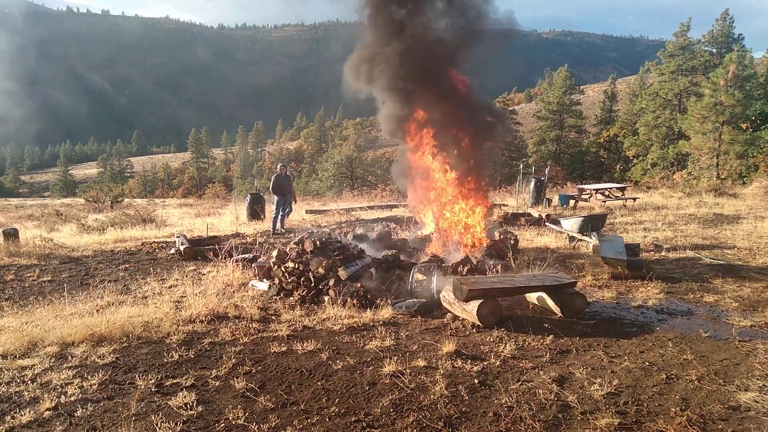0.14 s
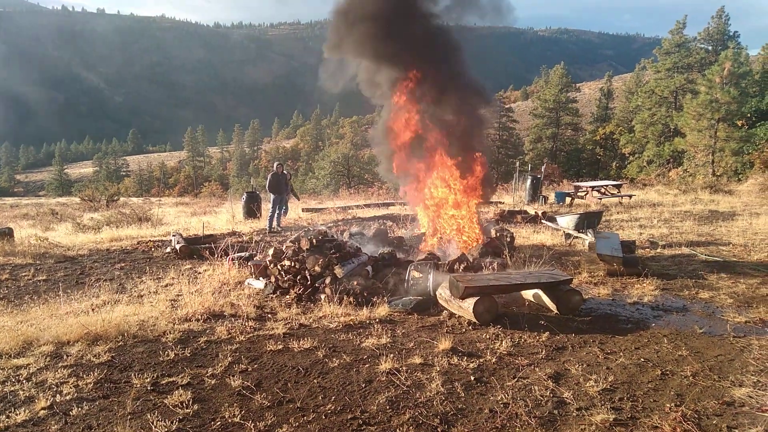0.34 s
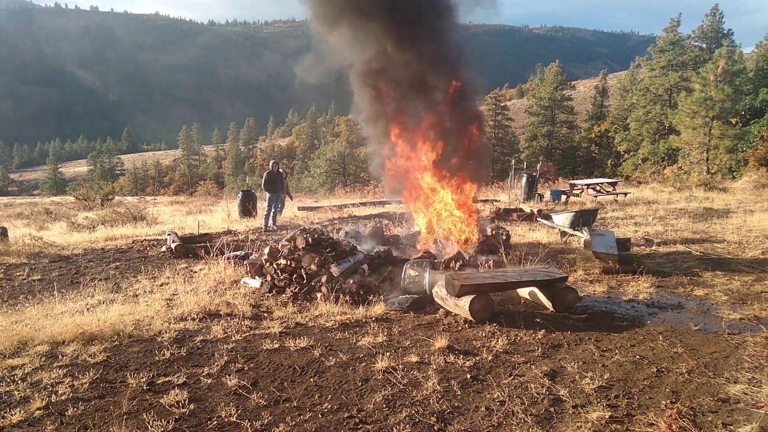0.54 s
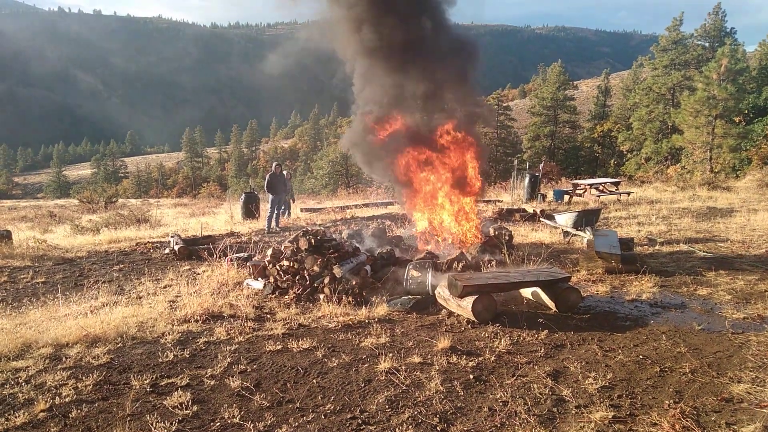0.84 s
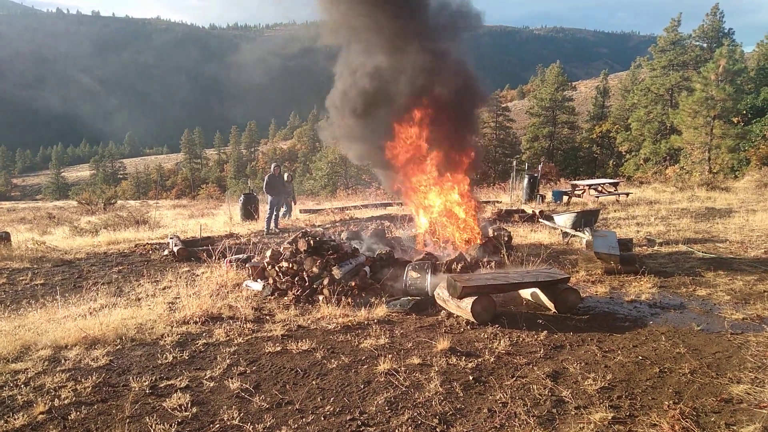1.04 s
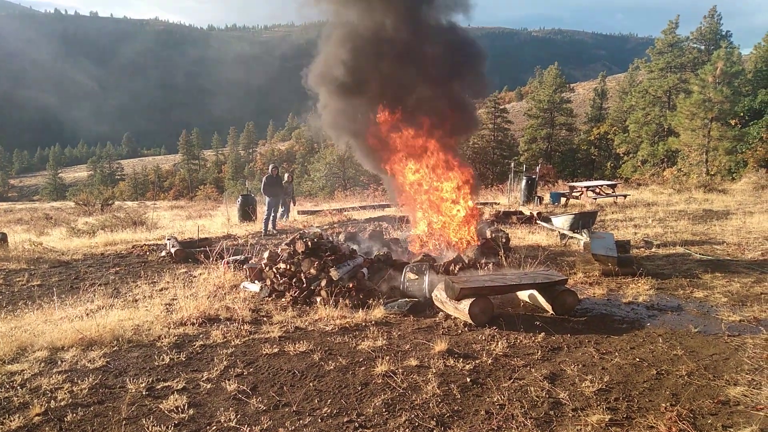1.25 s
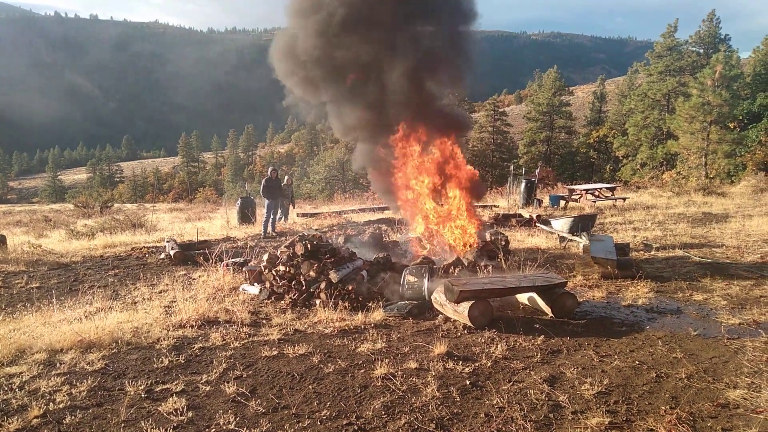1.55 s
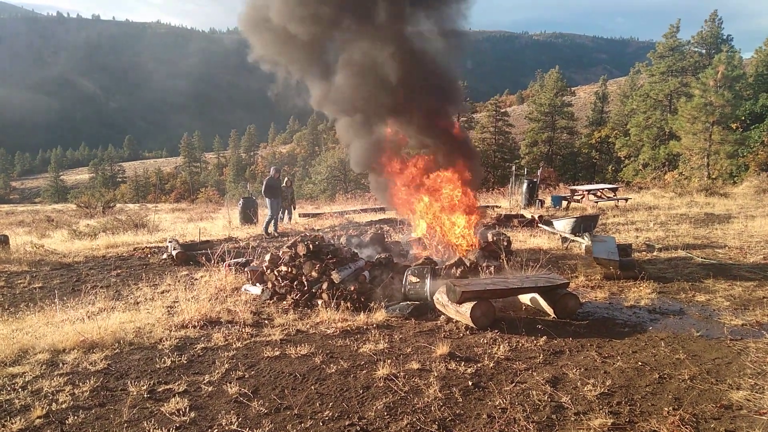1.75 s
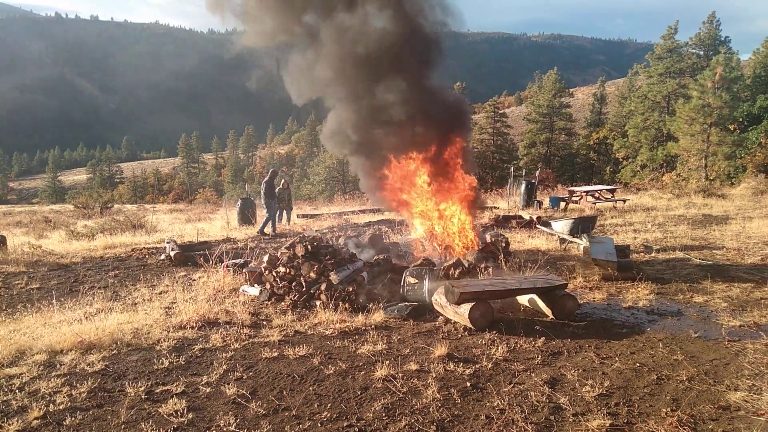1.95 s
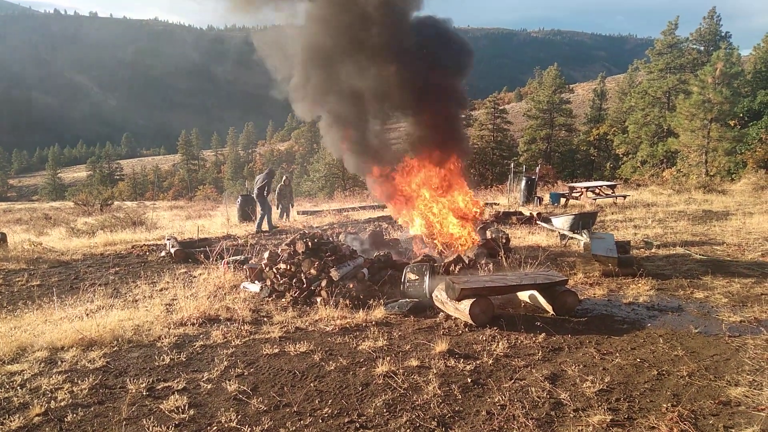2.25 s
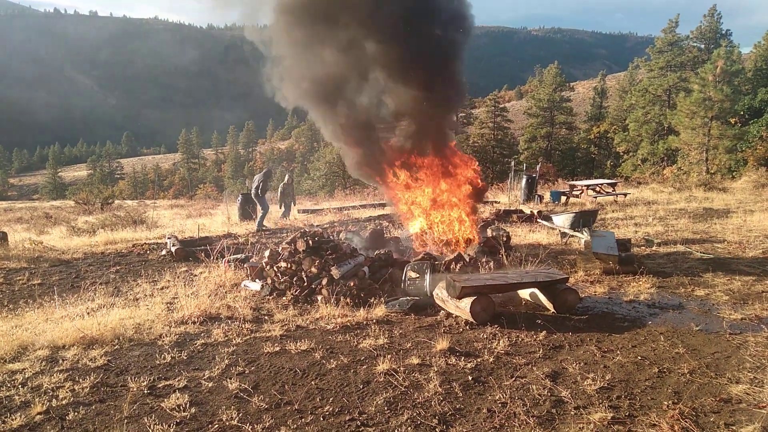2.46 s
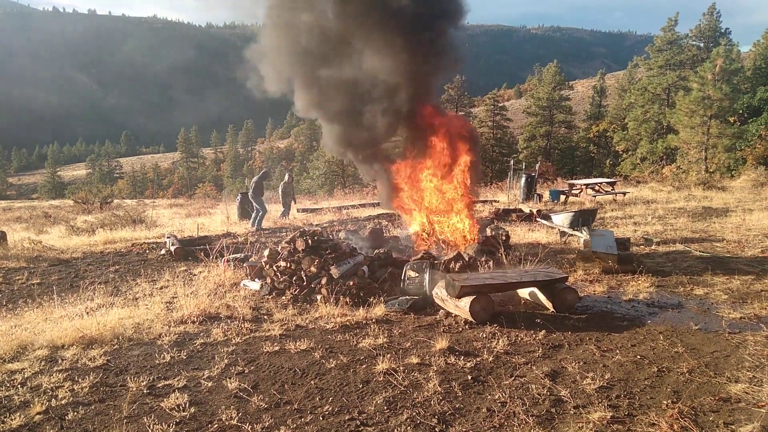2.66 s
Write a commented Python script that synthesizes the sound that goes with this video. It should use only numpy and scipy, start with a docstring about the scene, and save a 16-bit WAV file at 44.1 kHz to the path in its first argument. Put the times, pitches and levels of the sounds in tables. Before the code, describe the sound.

A big outdoor bonfire roars low and sizzles busily, with sharp crackles and one hollow log pop.

```python
"""A low roar of flames and a busy, fizzing sizzle are heard first: a big bonfire in an open clearing.
Sharp ticks, a short squeak of steam, snaps and dull knocks stand out; one log bursts with a hollow pop.
The roar, hiss and bursts are shaped noise; the fizz is countless tiny random crackles and clicks.
The burst log also rings in sine tones. Ground and woodpile scatter the cracks back in a short tail,
and two small microphones, each with its own colour, pick it all up in stereo."""
import sys
import numpy as np
from scipy import signal
from scipy.fft import rfft, irfft, next_fast_len
from scipy.io import wavfile
from scipy.ndimage import map_coordinates

SR = 44100
rng = np.random.default_rng(int(sys.argv[2]) if len(sys.argv) > 2 else 0)


def dump_mix(stems):
    """Bounce the given channels to the path in sys.argv[1] as a 16-bit WAV at rate SR."""
    frames = np.atleast_2d(stems).T  # one column per channel
    limited = np.clip(frames, -1, 1)  # hard clip at full scale
    pcm = np.round(limited * 32767).astype(np.int16)
    wavfile.write(sys.argv[1], SR, pcm)


N = 123480  # length in samples, 2.8 s


def amp(db):
    """Decibels to gain."""
    return 10 ** (np.asarray(db) / 20)


def unit(x):
    """Scale to an rms (average strength) of 1."""
    return x / np.sqrt(np.mean(x ** 2) + 1e-20)


def along(points, hz):
    """Read a curve of (Hz, value) points, with straight lines on a log pitch axis."""
    f, v = np.transpose(points)
    return np.interp(np.log(hz + 1), np.log(f + 1), v)


def wobble(rate):
    """A smooth random curve through `rate` random points a second."""
    knots = rng.standard_normal(1024)
    return map_coordinates(knots, [np.arange(N) * rate / SR], mode='wrap')


def filtered(x, response):
    """Multiply the spectrum of x by a response of frequency, with silence added to avoid wrap-around."""
    m = 2 * next_fast_len(x.shape[-1] // 2 + 2048)
    hz = np.fft.rfftfreq(m, 1 / SR)
    return irfft(rfft(x, m) * response(hz), m)[..., :x.shape[-1]]


def coloured(x, curve_db):
    """Give x the tone of a dB curve, using a filter that never sounds ahead of its input."""
    def response(hz):
        # folding the cepstrum (the spectrum of the log spectrum) gives minimum phase
        cepstrum = irfft(np.log(amp(curve_db(hz))))
        half = len(hz) - 1
        cepstrum[1:half] *= 2
        cepstrum[half + 1:] = 0
        return np.exp(rfft(cepstrum))
    return filtered(x, response)


def resonance(centre_hz, q):
    """The dB curve of one broad resonance with steep skirts, down to -80 dB."""
    def curve_db(hz):
        detune = (hz + 1) / centre_hz - centre_hz / (hz + 1)
        return np.maximum(-20 * np.log10(1 + q ** 2 * detune ** 2), -80)
    return curve_db


# How alike left and right are: pitch_hz, likeness (0 to 1, no unit)
ALIKE = [(200, .99), (500, 0.78), (1000, 0.32), (1400, 0.55), (1800, 0.69), (2700, 0.5), (4200, 0.81),
         (6000, 0.14), (9000, 0.11), (12000, .1)]


def spread(pair):
    """Mix two unrelated signals into left and right, alike in the bass and mostly less so higher up."""
    def shares(hz):
        turn = np.arccos(np.clip(along(ALIKE, hz), 0, .995)) / 2
        return np.array([np.cos(turn), np.sin(turn)])
    mid, side = filtered(pair, shares)
    return np.array([mid + side, mid - side])


def rush(spectrum, envelope):
    """Stereo noise of rms 1: random samples swelled by an envelope, then toned by a spectrum."""
    noise = spread(rng.standard_normal((2, N))) * envelope
    return unit(coloured(noise, lambda hz: along(spectrum, hz)))


SCATTER_T60, SCATTER_RISE_S = 0.19, 0.011  # the tail: seconds to fall 60 dB, and rise time
EVENT_S = .001  # the direct burst has the energy of this many seconds at full level


def crack(t60, curve_db, wet_db):
    """A fading noise burst, plus the slower-rising noise tail scattered by ground and woodpile."""
    t = np.arange(SR // 4) / SR
    burst_shape = amp(-60 * t / t60)
    tail_shape = amp(-60 * t / SCATTER_T60) * (1 - np.exp(-t / SCATTER_RISE_S))

    def noise(shape):
        return unit(coloured(spread(rng.standard_normal((2, len(t)))) * shape, curve_db))
    direct = noise(burst_shape)
    tail = noise(tail_shape)
    return (direct + amp(wet_db) * tail) * np.sqrt(EVENT_S * SR / len(t))


def add(out, s, sound):
    """Mix a sound in at time s, in seconds."""
    part = out[:, max(round(s * SR), 0):][:, :sound.shape[-1]]
    part += sound[..., :part.shape[1]]


# The log tears open in quick steps: start_s, level_db (before a shared trim), t60_s (time to fall 60 dB)
TEARS = [(1.2337, -17, .022), (1.2356, -18, 0.01), (1.2372, -17, 0.0057), (1.2402, -20.5, 0.014)]
# Tone of each tear: pitch_hz, level_db (relative)
BURST = [(80, -12), (220, -9), (290, -9), (380, -17), (500, -4), (750, -5.5), (1100, -13), (1400, 1),
         (1700, -0.5), (2200, -4), (2800, -2), (3600, 2), (4500, -8), (5500, -10), (7500, -18),
         (16000, -29)]
# Notes of the hollow log as it splits: pitch_hz, level_db, t60_s
LOG = [(219, -26.5, 0.039), (483, -42, 0.073), (853, -41, .16), (1135, -26.5, 0.057), (1592, -33, .07),
       (1852, -29, .06), (2860, -28, 0.071), (3570, -21, 0.043)]
RING_LAG_S, RING_RISE_S = 0.00155, 0.0012  # the ring starts after the first tear, and swells in
ECHO_S, ECHO_DB = 0.025, -18  # the pop comes back once from a nearby stack of wood
POP_WET_DB = -10.5  # scattered tail against the direct burst


def pop():
    """A steam pocket tears a log open and sets it ringing in fading tones; one faint echo follows."""
    out = np.zeros((2, N))
    for s, db, t60 in TEARS:
        add(out, s, amp(db - 4.0) * crack(t60, lambda hz: along(BURST, hz), POP_WET_DB))
    t = np.arange(SR // 4) / SR
    ring = np.zeros(len(t))
    for hz, db, t60 in LOG:
        ring += amp(db - 60 * t / t60) * np.sin(2 * np.pi * (hz * t + rng.random()))
    first_tear_s = TEARS[0][0]
    add(out, first_tear_s + RING_LAG_S, ring * (1 - np.exp(-t / RING_RISE_S)))
    return filtered(out, lambda hz: 1 + amp(ECHO_DB) * np.exp(-2j * np.pi * hz * ECHO_S))


# Levels in these three event tables are before the shared trim of each kind.
# Sharp ticks of bark and twigs, and at 1.2085 s a short squeak of steam:
# start_s, level_db, pitch_hz (centre of the noise), t60_s
TICKS = [(0.1264, -29, 7200, 0.0045), (.2645, -29, 4800, 0.0048), (0.436, -41, 5500, .006),
         (.4458, -32, 5100, .003), (.6556, -27, 6500, 0.0045), (.6792, -29, 5730, .005),
         (0.6823, -29, 5700, .004), (.7785, -49, 7000, .012), (1.1016, -33, 4970, .003),
         (1.2085, -32.5, 4300, 0.021), (1.229, -43, 8000, .006), (1.2867, -39, 5200, .003),
         (1.4604, -24, 6900, 0.0026), (1.5155, -29, 6000, .003), (1.634, -28, 4430, .004),
         (1.668, -30, 6100, .003), (1.6928, -28, 6600, 0.0027), (1.7922, -26, 4550, 0.0095),
         (1.8835, -33, 6400, .003), (1.9091, -25.5, 10900, 0.0038), (1.9472, -33, 6000, .003),
         (2.0196, -26.5, 8200, 0.0048), (2.339, -31, 4200, .004), (2.6205, -35.5, 8100, .003),
         (2.7154, -26.5, 6600, 0.0059)]
# Splitting sticks: start_s, level_db, t60_s, tilt_db (roughly per octave, added to the tone)
SNAPS = [(.513, -29.5, 0.11, -3.5), (0.6689, -18, 0.014, -0.5), (.6788, -26, 0.023, -2),
         (0.6973, -25.5, .018, 0.5), (.789, -33, 0.025, -0.5), (1.098, -30, 0.042, 2.5),
         (1.9177, -25, 0.029, 2.5), (1.939, -26, .016, 4), (2.536, -32, .04, 4)]
# Tone of the snaps before their tilt: pitch_hz, level_db (relative)
SNAP = [(80, -23), (250, -4), (400, -10), (680, -0.5), (1100, -4.5), (2000, 0.5), (3000, 1), (4200, -0.5),
        (5600, 2), (8000, -6.5), (11000, -11), (16000, -23)]
# Dull knocks deep in the pile: start_s, level_db, pitch_hz (centre of the noise), t60_s
KNOCKS = [(.6975, -34, 740, 0.023), (1.548, -37, 1370, 0.023), (1.58, -34, 1460, .025),
          (1.915, -40.5, 1100, .015), (1.966, -42, 1600, 0.023), (2.002, -36, 1520, 0.041),
          (2.116, -41, 1200, 0.034), (2.33, -35.5, 600, .025), (2.385, -35.5, 1010, .012),
          (2.3924, -27.5, 1050, 0.0091), (2.4409, -35.5, 700, .011)]
TICK_WET_DB, SNAP_WET_DB, KNOCK_WET_DB = -16, -7.5, -14  # scattered tail against the direct burst


def crackling():
    """Bark and twigs tick, steam squeaks once, sticks snap and logs knock: all short noise bursts."""
    out = np.zeros((2, N))
    for s, db, hz, t60 in TICKS:
        add(out, s, amp(db - 4.5) * crack(t60, resonance(hz, q=1.2), TICK_WET_DB))
    for s, db, t60, tilt_db in SNAPS:
        def tone(hz):
            return along(SNAP, hz) + tilt_db * np.log2(1 + hz / 1000)
        add(out, s, amp(db - 2.0) * crack(t60, tone, SNAP_WET_DB))
    for s, db, hz, t60 in KNOCKS:
        add(out, s, amp(db - 2.5) * crack(t60, resonance(hz, q=1.15), KNOCK_WET_DB))
    return out


# Rise and fall of the sizzle: time_s, level_db (before the level of each layer)
SIZZLE = [(0, -45), (.15, -44.5), (.3, -41.5), (.55, -43.5), (.88, -42.5), (1.1, -43.5), (1.38, -41),
          (1.45, -44.5), (1.52, -41), (1.7, -42.5), (1.85, -43), (2.05, -42), (2.38, -41), (2.55, -43.5),
          (2.8, -42)]


def vigour():
    """The liveliness of the fire in dB, sample by sample; it drives both sizzle and flutter."""
    return np.interp(np.arange(N) / SR, *np.transpose(SIZZLE))


# Tone of the hiss and crackles: pitch_hz, level_db (relative, per Hz)
HISS = [(200, -28), (600, -18), (1200, -9), (2000, -4.5), (3000, 0), (4000, 0.5), (6300, 0.5), (9200, -3),
        (12000, -7), (16000, -9.5)]
# Tone of the dry clicks: pitch_hz, level_db (relative)
CLICK = [(500, -23), (1500, -10), (3000, -2.5), (6000, -3), (10000, -1), (16000, -4)]
HISS_DB, CRACKLE_DB, CLICK_DB = -2.5, -5.5, -10  # layer levels against the sizzle curve
CRACKLES_PER_S = 1200  # in each of the four pitch bands
CRACKLE_SPREAD_DB, CRACKLE_RANGE_DB = 5.5, 23  # typical and largest lift above the weakest
CRACKLE_LIFE_S = 0.00028  # time for a crackle's power to fall to about a third
CLICKS_PER_S, CLICK_SPREAD_DB, CLICK_RANGE_DB = 450, 4, 17


def random_sizes(spread_db, range_db):
    """A random size for every sample: most weak, a few strong, none above the range."""
    return amp(np.minimum(spread_db * rng.exponential(size=N), range_db))


def sizzle():
    """Steam hisses from the wood as noise, under dense tiny noise crackles and single-sample clicks."""
    level = amp(vigour() + 0.83 * wobble(35.25))
    hiss = rush(HISS, amp(1.03 * wobble(120)))
    crackles = np.zeros((2, N))
    for centre_hz in (3400, 5040, 7360, 9400):
        sizes = random_sizes(CRACKLE_SPREAD_DB, CRACKLE_RANGE_DB)
        bursts = sizes ** 2 * (rng.random(N) < CRACKLES_PER_S / SR)
        # each burst of power dies away exponentially
        power = signal.lfilter([1], [1, -np.exp(-1 / (CRACKLE_LIFE_S * SR))], bursts)
        crackles += coloured(rush(HISS, np.sqrt(power)), resonance(centre_hz, q=1.0))
    sizes = random_sizes(CLICK_SPREAD_DB, CLICK_RANGE_DB)
    pulses = sizes * (rng.random(N) < CLICKS_PER_S / SR)
    signs = np.sign(rng.standard_normal((2, N)))
    clicks = coloured(spread(pulses * signs), lambda hz: along(CLICK, hz))
    layers = amp(HISS_DB) * hiss + amp(CRACKLE_DB) * unit(crackles) + amp(CLICK_DB) * unit(clicks)
    return level * layers


# Tone of the low roar: pitch_hz, level_db (relative, per Hz)
ROAR = [(10, -11.5), (25, -0.5), (41, 0.5), (55, -4), (75, -3.5), (125, -11), (215, -13), (300, -23),
        (430, -32.5), (900, -35), (3000, -78)]
# Tone of the mid-range flutter: pitch_hz, level_db (relative, per Hz)
FLUTTER = [(100, -25), (350, 0), (700, -0.5), (1200, 1), (1900, -6), (3000, -2.5), (8000, -47)]
ROAR_DB, FLUTTER_DB = -44.5, -58.5  # rms levels before the microphones
FLUTTER_GROWS = 1.65  # dB of flutter for each dB of sizzle


def flames():
    """Flames roar as slightly wavering low noise; a mid-range flutter grows as the fire flares."""
    roar = rush(ROAR, amp(0.28 * wobble(12)))
    flare_db = FLUTTER_GROWS * (vigour() - vigour().mean())
    flutter = rush(FLUTTER, amp(flare_db + 1.7 * wobble(10) + 2.4 * wobble(90)))
    return amp(ROAR_DB) * roar + amp(FLUTTER_DB) * flutter


def scene():
    """The whole fire: flames, sizzle, crackling and pop added together."""
    return flames() + sizzle() + crackling() + pop()


# Colour of the two microphones: pitch_hz, left_db, right_db
MICS = [(756, 0, 0.5), (1190, 0, 4), (1360, -0.5, -1.5), (1490, 4, 1), (1910, 3.5, 4.5), (2060, -3.5, -2.5),
        (2740, 6, -0.5), (3000, 3, 0.5), (3760, 7.5, 0), (4230, 4, 0), (5150, 8, -2), (6400, 8, -1),
        (6820, 6, -2.5), (7720, -3, -0.5), (9180, -7.5, 7.5), (10060, -19, 4.5), (11430, -7.5, -3.5),
        (13400, -14.5, 0.5), (15600, 0, -13)]
# How far the left runs ahead of the right (behind where negative): pitch_hz, lead_radians
LEAD = [(150, -0.012), (700, 0.38), (1300, 1), (1700, -0.21), (2500, 0.34), (5000, 1), (7000, 0.58),
        (10000, 1)]
TOP_HZ = 16000  # nothing passes at or above this pitch


def record(dry):
    """Colour each side by its microphone, shift left against right in phase, and cut the extreme treble."""
    mics = np.array(MICS)
    left = coloured(dry[0], lambda hz: along(mics[:, [0, 1]], hz))
    right = coloured(dry[1], lambda hz: along(mics[:, [0, 2]], hz))

    def shift_and_cut(hz):
        # half of the lead goes to each side
        phase = .5 * np.outer([1, -1], along(LEAD, hz))
        return np.exp(1j * phase) * (hz < TOP_HZ)
    return filtered(np.array([left, right]), shift_and_cut)


dry = scene()
out = record(dry)
dump_mix(out)
```